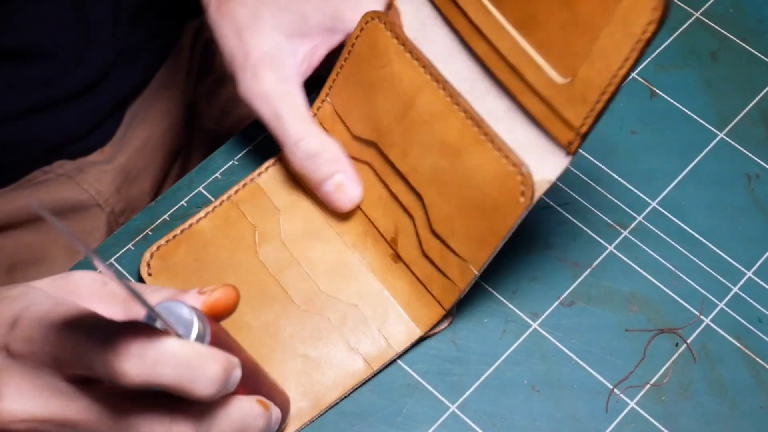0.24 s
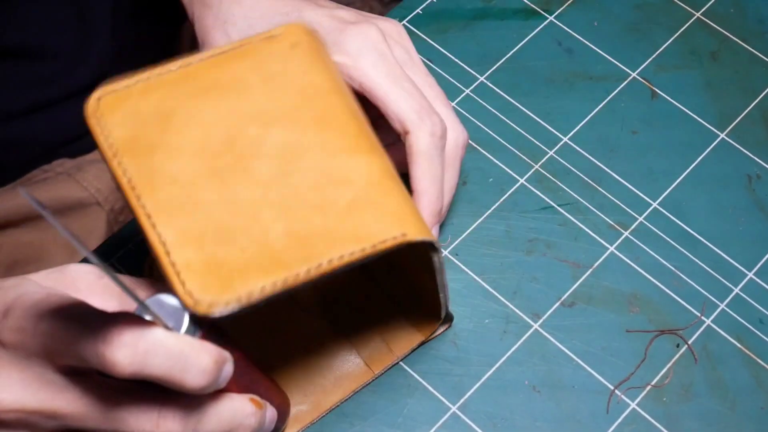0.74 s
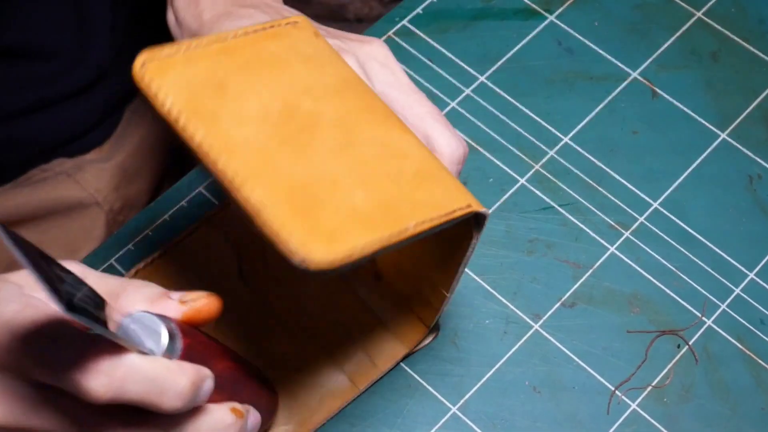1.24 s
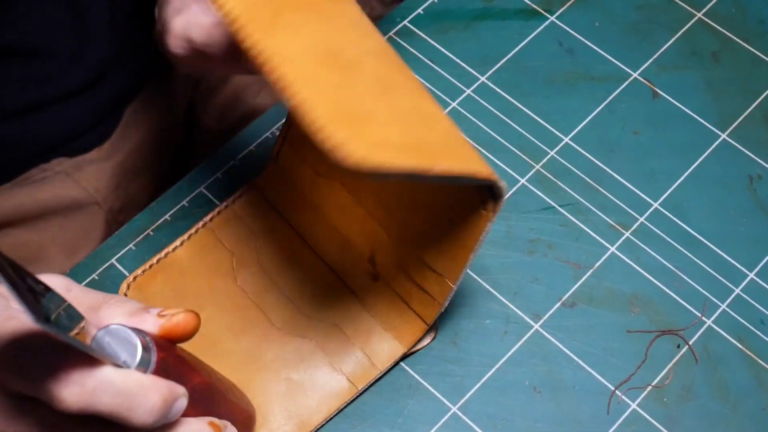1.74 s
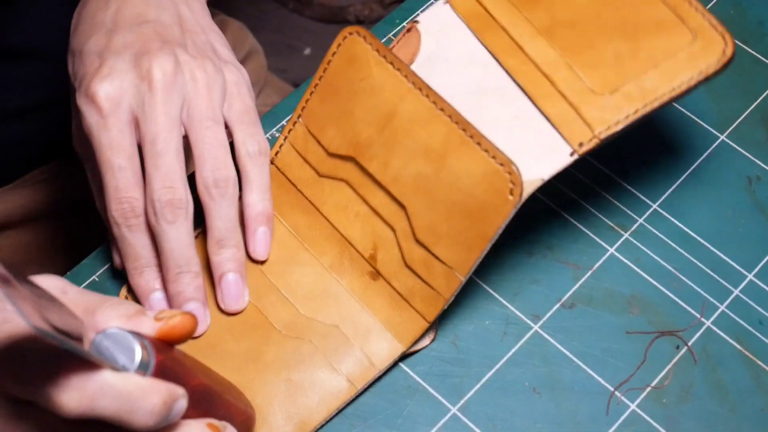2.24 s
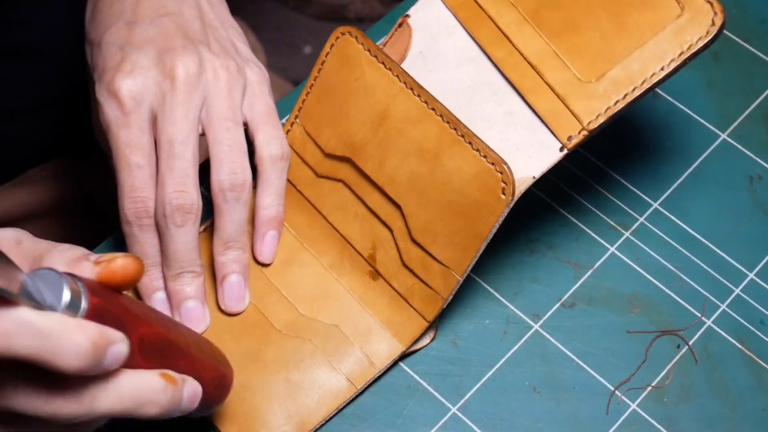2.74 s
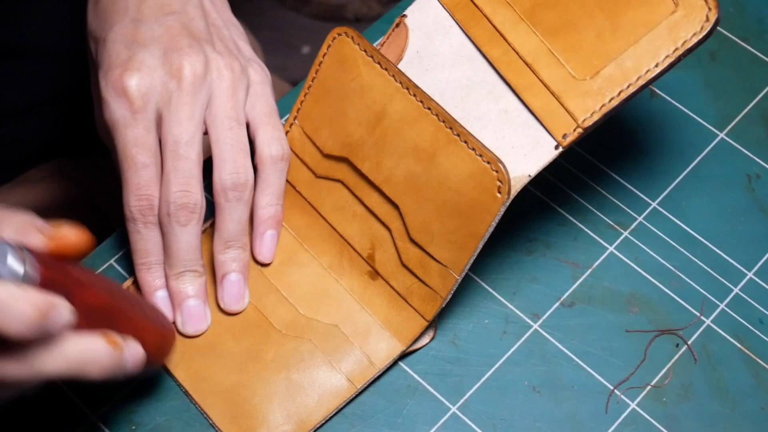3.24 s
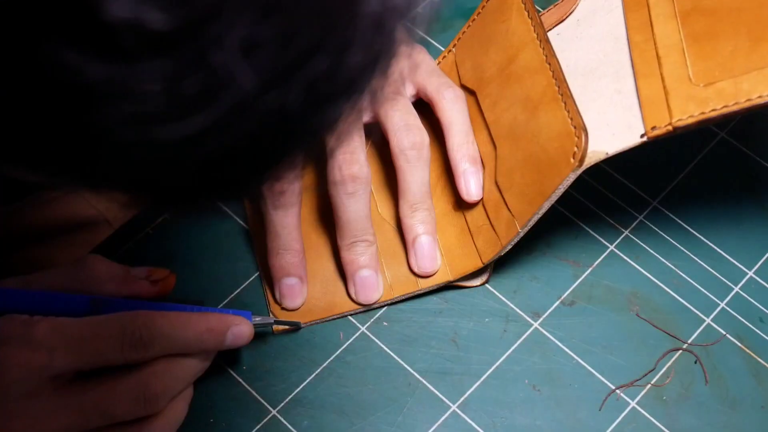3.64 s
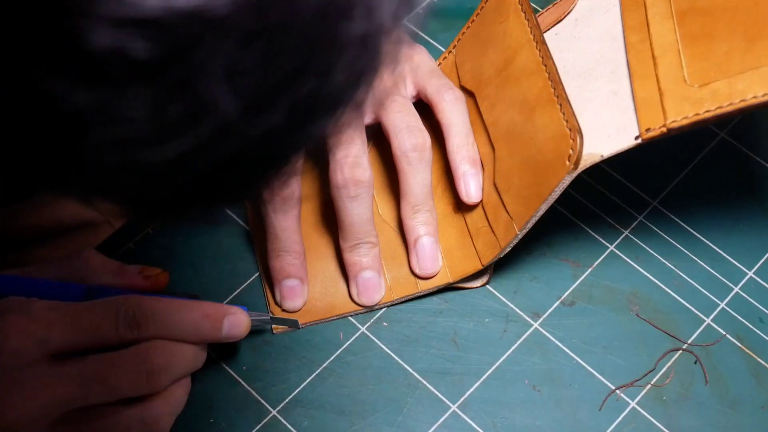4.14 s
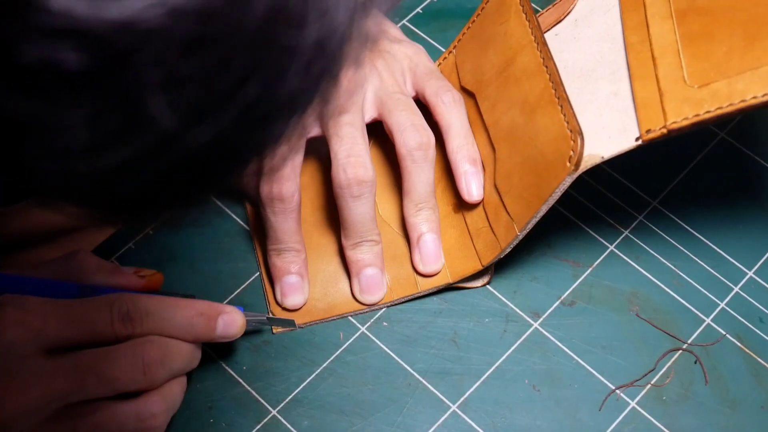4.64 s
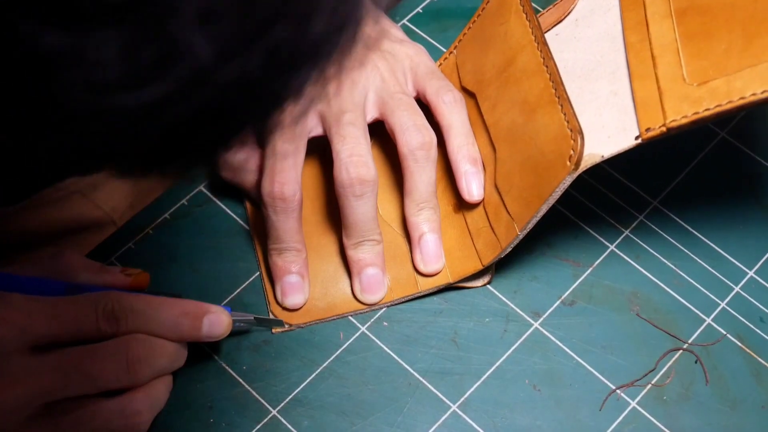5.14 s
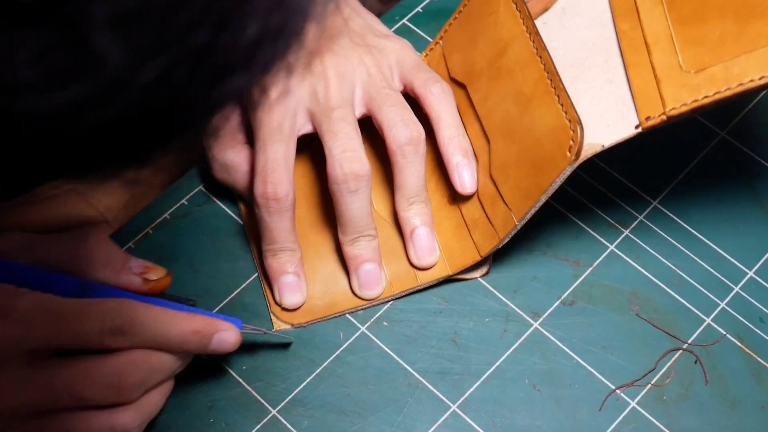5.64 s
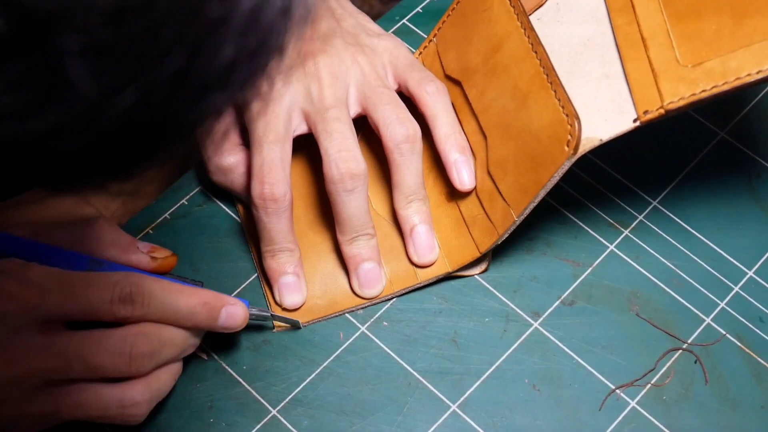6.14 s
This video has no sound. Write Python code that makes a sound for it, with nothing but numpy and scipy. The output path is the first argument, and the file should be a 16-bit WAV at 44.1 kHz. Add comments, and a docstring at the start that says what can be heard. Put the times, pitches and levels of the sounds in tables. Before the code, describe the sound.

Close to a workbench in a small room, leather snaps softly and a wallet cover flops over. Five hard, overloaded knocks thump and crack, ringing the bench top and rattling loose tools, the last three close together. Then a small motor hums upward under a growing rush of air, while a pen taps and scratches the leather edge. A faint, very rapid ticking runs throughout.

```python
"""Five hard knocks on a workbench top in a small room: thump, crack, ringing modes and rattling loose tools.
A leather wallet is handled there: bursts of band noise make its snaps, flopping cover, pen taps and scratches;
swelling, grainy noise makes the rubbing strokes. A faint, even ticking of 50 short bursts a second runs through.
After the last knock a small motor runs up, as rising harmonics under a rush of air, while the pen works on.
Steady coloured noise is the still air, and dying bands of noise are the room."""
import sys
import numpy as np
from scipy import signal
from scipy.io import wavfile

SR = 44100
rng = np.random.default_rng(int(sys.argv[2]) if len(sys.argv) > 2 else 0)


def dump(signal):
    """Clip the signal to [-1, 1] and save it as 16-bit WAV at the path in sys.argv[1]."""
    limited = np.clip(np.atleast_2d(signal).T, -1, 1)
    pcm = np.round(limited * 32767).astype(np.int16)
    wavfile.write(sys.argv[1], SR, pcm)


N = 281799
TIME = np.arange(N) / SR

# bright air spectrum shared by the rubbing and the motor: (frequency [Hz], relative density [dB per Hz])
HISS_SPECTRUM = [(4000, -16), (6000, -40), (7400, 8.5), (8200, 2), (10000, -1), (13000, 0), (15500, -15)]


def from_db(db):
    """Decibels to amplitude gain."""
    return 10 ** (np.asarray(db) / 20)


def rms_one(x):
    """Scale to unit power."""
    return x / np.sqrt(np.mean(x ** 2) + 1e-20)


def in_time(rows):
    """Draw each column of a breakpoint curve as straight lines over the whole scene."""
    times, *columns = np.transpose(rows)
    return [np.interp(TIME, times, column) for column in columns]


def at_hz(points, hz):
    """Read a curve at a frequency, straight on a logarithmic frequency axis."""
    curve_hz, values = np.array(points).T
    return np.interp(np.log(hz), np.log(curve_hz), values)


def add(out, s, sound):
    """Mix a sound in at a given time in seconds."""
    start = round(s * SR)
    out[:, start:start + sound.shape[-1]] += sound[..., :N - start]


def band(x, low_hz, high_hz, order=2):
    """Causal Butterworth band-pass."""
    sos = signal.butter(order, [low_hz, high_hz], "band", fs=SR, output="sos")
    return signal.sosfilt(sos, x)


def drift(rate):
    """Random curve about zero: straight lines between unit-spread knots, rate knots per second."""
    knots = rng.standard_normal(2000)
    return np.interp(TIME * rate, np.arange(len(knots)), knots)


def noise_bands(size, span=(0, np.inf)):
    """Yield (centre Hz, stereo noise) by third octaves; shared and opposed parts set how alike the sides are."""
    # (frequency [Hz], left-right likeness [0 to 1])
    likeness = [(60, 0.53), (250, 0.32), (500, 0.17), (1000, 0.067), (2500, 0.96), (4500, 0.49),
                (12000, 0.05)]
    white = rng.standard_normal((2, 2, size))
    edges = 32 * 2 ** (np.arange(28) / 3)
    for k, (low, high) in enumerate(zip(edges, edges[1:])):
        hz = np.sqrt(low * high)
        if span[0] <= hz <= span[1]:
            mid, side = band(white[k % 2], low, high)  # neighbouring bands draw on separate noise
            alike = np.clip(at_hz(likeness, hz), -1, 1)
            yield hz, np.sqrt((1 + alike) / 2) * mid + np.sqrt((1 - alike) / 2) * side * [[1], [-1]]


def coloured(spectrum):
    """Stereo noise shaped to a spectrum band by band, at unit rms."""
    bands = noise_bands(N, span=(spectrum[0][0], spectrum[-1][0]))
    return rms_one(sum(from_db(at_hz(spectrum, hz)) * noise for hz, noise in bands))


def burst(low_hz, high_hz, decay_s, width):
    """A brief crunch of dying contact noise; both sides together hold the energy of a decay from 1."""
    t = TIME[:SR // 8]
    dying = rng.standard_normal((2, len(t))) * np.exp(-t / decay_s)
    mid, side = band(dying, low_hz, high_hz, order=3)
    stereo = mid + width * side * [[1], [-1]]
    return stereo * np.sqrt(decay_s * SR / 2 / np.sum(stereo ** 2))


def knocks(ring_delay_s=0.001332, echo_s=0.00882, echo_db=-11, rattle_delay_s=0.0097, scatter_db=-18, radiate_db=30):
    """Thump, reflection, crack, ring and tools landing again; returns the near sound and the room's feed."""
    # knocks: (time [s], thump [dB], crack [dB], edge [dB], ring [dB], rattle [dB], rattle decay [s])
    blows = [(0.2326, 1, -9, -9.5, -2.5, -30, 0.009), (1.4924, 0.5, -2.5, -10.5, -0.5, -32.5, 0.011),
             (2.5681, 0, -4.5, -18, -0.5, -33.5, 0.0085), (2.8540, 3.5, -7.5, -44, 0, -29.5, 0.0067),
             (3.1222, 3.5, -13.5, -17, 1, -26, 0.016)]
    # modes of the bench top: (frequency [Hz], relative level [dB], t60 [s])
    bench_modes = [(125, -17, .32), (196, -22, .2), (217, -18, .26), (246, -27, .25), (274, -16, .2),
                   (312, -22, .2), (349, -15.5, .27), (386, -27, .25), (415, -29, .3), (452, -19.5, .34),
                   (490, -27, .3), (517, -30, .33), (554, -28, .27), (608, -26, .32), (657, -32, .25),
                   (683, -33, .28), (720, -34, .33), (800, -33, .3), (895, -36, .33)]
    # modes of the hard contact: (frequency [Hz], relative level [dB], t60 [s])
    crack_modes = [(640, -45, 0.017), (880, -28, 0.0023), (1233, 1, 0.012), (1746, -2.5, 0.011),
                   (2645, -6, 0.009), (3920, -10, 0.0033)]
    # modes of loose metal tools: (frequency [Hz], relative level [dB], t60 [s])
    tool_modes = [(2160, -4, .025), (3195, -7, .02), (3440, -9, .02), (4020, -9, .025), (6925, -8, .04),
                  (9785, -15, .03)]

    near, sent = np.zeros((2, 2, N))
    slap = band(signal.unit_impulse(SR // 20), 345, 1800)
    for s, thump_db, crack_db, edge_db, ring_db, rattle_db, rattle_s in blows:
        push = from_db(thump_db) * thump(hz=308, swell_s=0.0021, right_lag_s=0.00028)
        add(near, s - .0003, push)
        add(near, s + echo_s, from_db(echo_db) * push)
        add(near, s, from_db(crack_db) * struck(crack_modes, vary_db=3.0, spread=0.038, polarity=-1.056))
        add(near, s, from_db(edge_db) * burst(1980, 3620, decay_s=0.0028, width=0.16))
        add(near, s, from_db(edge_db - 17.0) * burst(3500, 14000, decay_s=0.001, width=1.0))
        # the blow scatters through the top as a short dense clatter
        add(near, s + .003, from_db(scatter_db) * burst(800, 2610, decay_s=0.011, width=0.12))
        add(near, s + ring_delay_s, -from_db(ring_db) * struck(bench_modes, vary_db=0.53, spread=0.18))

        # the tools land again: contact noise, which also excites their metal
        chatter = from_db(rattle_db) * burst(2100, 13600, decay_s=rattle_s, width=0.54)
        metal = struck(tool_modes, vary_db=2.0, spread=.7)
        add(near, s + rattle_delay_s, chatter)
        add(near, s + rattle_delay_s, from_db(-16.0) * signal.fftconvolve(chatter, metal, axes=1))

        # the whole top radiates into the room
        add(sent, s, push)
        add(sent, s, from_db(radiate_db + 0.18 * crack_db) * slap)
        add(sent, s + rattle_delay_s, chatter)
    return near, sent


def thump(hz, swell_s, right_lag_s):
    """The top gives under the blow in a few heavily damped swings; the air follows their slope."""
    t = np.maximum(TIME[:SR // 8] - np.array([[0], [right_lag_s]]), 0)
    swell = (t / swell_s) ** 2 * np.exp(2 - 2 * t / swell_s)
    swing = -swell * np.cos(2 * np.pi * hz * t)
    return np.gradient(swing, axis=1) * SR / (2 * np.pi * hz)


def struck(modes, vary_db, spread, polarity=1):
    """Decaying modes, weighted anew at every blow, unequal and slightly out of step at the two sides."""
    # where the modes lean: (frequency [Hz], left minus right [dB])
    side_lean = [(125, -1.5), (250, -1.5), (350, 1), (480, 1.5), (650, 2), (950, -1), (3000, 1)]
    t, out, sides = TIME[:SR], 0, np.array([[1], [-1]])
    for k, (hz, db, t60) in enumerate(modes):
        skew = spread * rng.standard_normal() * sides  # phase [rad]
        height = from_db(db + vary_db * rng.standard_normal() + sides * at_hz(side_lean, hz) / 2)
        decay = np.exp(-np.log(1000) * t / t60)
        out = out + polarity ** k * height * decay * np.sin(2 * np.pi * hz * t + skew)
    return out


def flop(start_s=.7848, face_delay_s=.002):
    """The cover falls over: its edge snaps, then its face slaps and scuffs to rest."""
    out = np.zeros((2, N))
    face_s = start_s + face_delay_s
    add(out, start_s, snap(-15, hz=2340, octaves=0.93, decay_s=0.0025, treble_db=-37))
    add(out, face_s, from_db(-16) * burst(low_hz=520, high_hz=2200, decay_s=0.0023, width=.21))
    add(out, face_s, from_db(-34.5) * burst(low_hz=1440, high_hz=2670, decay_s=0.045, width=0.36))
    return out


def clicks():
    """Dull snaps of folded and pressed leather, narrow pen taps on the edge, bright scratches of a catching tip."""
    # leather snaps: (time [s], level [dB], decay [s])
    leather_snaps = [(0.0989, -40.5, .0026), (0.2202, -28, 0.011), (.6662, -39.5, 0.0015),
                     (.707, -40, .0017), (.7645, -40, .0022), (1.0822, -35.5, .006), (2.083, -38.5, 0.0064),
                     (2.101, -38, 0.0034)]
    # pen taps: (time [s], level [dB], pitch [Hz])
    pen_taps = [(4.3288, -26, 2600), (4.4172, -38, 2200), (4.5962, -25, 2580), (5.9122, -33.5, 3270),
                (6.032, -41, 3430)]
    # pen scratches: (time [s], level [dB])
    pen_scratches = [(4.940, -38), (5.436, -22), (5.4718, -20.5), (5.483, -21), (5.9594, -40), (5.978, -35)]
    out = np.zeros((2, N))
    for s, db, decay_s in leather_snaps:
        add(out, s, snap(db, hz=1940, octaves=1.3, decay_s=decay_s, treble_db=-25))
    for s, db, hz in pen_taps:
        add(out, s, snap(db, hz, octaves=0.53, decay_s=.0023, treble_db=-28))
    for s, db in pen_scratches:
        add(out, s, snap(db, hz=2370, octaves=1.29, decay_s=.0045, treble_db=-4.5))
    return out


def snap(db, hz, octaves, decay_s, treble_db):
    """A small contact: a woody noise body about its pitch and a share of bright edge."""
    ratio = 2 ** (octaves / 2)
    body = burst(hz / ratio, hz * ratio, decay_s, width=0.18)
    edge = burst(6150, 12100, decay_s, width=0.92)
    return from_db(db) * (body + from_db(treble_db) * edge)


def rubbing(grain_db=3.0, level_db=-4.0):
    """Strokes swell and fade; the grain of the leather catches and lets go many times in each."""
    # strokes: (middle [s], half length [s], body before the overall level [dB])
    strokes = [(0, 0.022, -49.5), (0.723, 0.025, -53.5), (0.821, .022, -42), (1.188, .11, -51),
               (1.274, 0.033, -44), (2.235, 0.22, -59.5), (5.115, .12, -51.5), (5.381, 0.032, -39),
               (5.479, 0.028, -36.5), (5.67, 0.082, -51.5), (5.98, 0.026, -45)]
    # body of the rub: (frequency [Hz], relative density [dB per Hz])
    rub_spectrum = [(600, -22), (1200, 3), (1800, 5), (2900, 2.5), (4000, -4), (5800, -27)]
    pen_from_s = 3.4  # before this the hand rubs, afterwards the pen
    hand_hiss_db, pen_hiss_db = -18.5, -9  # hiss against body; the pen's holds for a quick stroke
    quick_stroke_s, dulling_db_per_octave = 0.025, 7  # slower strokes of the pen hiss less
    body, hiss = 0, 0
    for s, half_s, db in strokes:
        stroke = from_db(db) * np.exp(-.5 * np.abs((TIME - s) / half_s) ** 2.4)
        hiss_db = hand_hiss_db
        if s > pen_from_s:
            hiss_db = pen_hiss_db - dulling_db_per_octave * np.log2(half_s / quick_stroke_s)
        body = body + stroke
        hiss = hiss + stroke * from_db(hiss_db)
    grain = from_db(grain_db * drift(rate=220) + level_db)
    return grain * (body * coloured(rub_spectrum) + hiss * coloured(HISS_SPECTRUM))


def motor(rumble_db=-53, flutter_db=1.0):
    """Orders 2 to 4 of the speed hum and climb ever more slowly, over rumble and an unsteady, growing rush of air."""
    # hum before the order weights: (time [s], second order [dB], third order [dB])
    hum_levels = [(3.4, -51, -42), (3.74, -50, -50.5), (4.06, -48, -40.5), (4.42, -53, -45),
                  (4.64, -47, -42.5), (4.84, -44, -55), (5.31, -34.5, -37), (5.79, -35, -35.5),
                  (6.3, -36.5, -31.5)]
    # rush of air: (frequency [Hz], relative density [dB per Hz])
    rush_spectrum = [(150, -8), (200, 3.5), (280, 1), (400, -7.5), (520, -6.5), (650, -6.5), (900, -18),
                     (1150, -19.5), (1900, -18.5), (2900, -24.5), (4200, -25.5), (5800, -42.5)]
    start_s, rise_s = 3.28, 0.082
    start_hz, top_hz, spin_up_s = 45.3, 54.0, 3.05  # speed at the start, its limit, time constant
    rush_db, rush_db_per_s, air_hiss_db = -48, 1.7, -69.5

    age = np.maximum(TIME - start_s, 0)
    speed = top_hz - (top_hz - start_hz) * np.exp(-age / spin_up_s)
    angle = 2 * np.pi * np.cumsum(speed) / SR
    even_db, odd_db = in_time(hum_levels)
    # weights of orders 2, 3 and 4; the fourth follows the second
    order_levels = [even_db + 0.5, odd_db - 0.5, even_db - 16.5]
    hum = np.sqrt(2) * sum(from_db(db) * np.sin(k * angle) for k, db in enumerate(order_levels, 2))
    hum = hum * from_db([[.5], [-.5]])  # slightly to the left

    rush = from_db(rush_db + rush_db_per_s * age) * hollow(coloured(rush_spectrum))
    air = rush + from_db(air_hiss_db) * coloured(HISS_SPECTRUM)
    air = air * from_db(flutter_db * drift(rate=12))
    rumble = from_db(rumble_db) * rms_one(band(rng.standard_normal(N), 96, 184, order=3))
    return np.minimum(age / rise_s, 1) * (hum + air + rumble)


def hollow(x):
    """Narrow resonances add to parts of a steady noise."""
    # resonances: (frequency [Hz], width [Hz], level [dB])
    resonances = [(485, 31, 7), (707, 12, 6.5), (803, 35, -3), (910, 18, 12.5), (2780, 200, -4)]
    out = x
    for hz, width, db in resonances:
        b, a = signal.iirpeak(hz, hz / width, fs=SR)
        out = out + from_db(db) * signal.lfilter(b, a, x)
    return out


def ticking(offbeat_db=-5, uneven_db=2):
    """Tiny noise ticks on a strict beat, strong and weak in turn, each a little uneven in level."""
    # strong ticks: (time [s], level [dB])
    tick_levels = [(0, -50), (.5, -59), (1.0, -48), (1.45, -47.5), (1.75, -54.5), (2.0, -45.5), (3.5, -55)]
    out = np.zeros((2, N))
    level_db = in_time(tick_levels)[0]
    for k, s in enumerate(np.arange(.0035, 6.36, .02)):  # one every 20 ms
        db = level_db[round(s * SR)] + offbeat_db * (k % 2) + uneven_db * rng.standard_normal()
        add(out, s, from_db(db) * burst(1610, 3120, decay_s=0.0029, width=0.48))
    return out


def room(x, gap_s=0.00082):
    """Reverberation of a small room: noise that dies at its own rate in each band, fading in after a gap."""
    # colour: (frequency [Hz], reverberation level [dB])
    reverb_colour = [(60, -6), (200, -14), (400, -12), (650, -9.5), (1200, -17.5), (2500, -11.5),
                     (4000, -10), (5700, -13), (7200, -1.5), (9000, -4), (15000, -8.5)]
    # decay: (frequency [Hz], t60 [s])
    reverb_t60 = [(100, 0.61), (500, 0.43), (2500, 0.5), (7500, 0.46), (11000, 0.28), (15000, 0.24)]
    t, response = TIME[:SR], 0
    for hz, noise in noise_bands(SR):
        decay_s = at_hz(reverb_t60, hz) / np.log(1000)
        level = from_db(at_hz(reverb_colour, hz)) * np.sqrt(2 / (decay_s * SR))
        response = response + level * noise * np.exp(-t / decay_s)
    response = response * np.clip(t / gap_s - 1, 0, 1)
    mono = x.mean(axis=0)[None]
    return signal.fftconvolve(mono, response, axes=1)[:, :N]


def still_air(level_db=-47.5):
    """The still air as steady coloured noise."""
    # background: (frequency [Hz], relative density [dB per Hz])
    floor_spectrum = [(18, -56), (30, -11), (64, -16.5), (124, -2), (215, 0.5), (404, -9), (499, 1),
                      (632, -23), (702, -10), (1130, -19.5), (2120, -25.5), (2980, -27.5), (5590, -38.5),
                      (14000, -40), (16000, -67)]
    return from_db(level_db) * coloured(floor_spectrum)


def scene():
    """Work on the bench, its room, the motor and the still air."""
    near, sent = knocks()
    handling = flop() + clicks() + rubbing() + ticking()
    return near + handling + room(sent + handling) + motor() + still_air()


def record(dry, low_cut_hz=55, top_cut_hz=15850):
    """The knocks overload the input and are flattened; deep bass and the very top are cut."""
    flattened = dry / (1 + dry ** 8) ** (1 / 8)
    low_cut = signal.butter(1, low_cut_hz, "high", fs=SR, output="sos")
    top_cut = signal.ellip(10, .1, 80, top_cut_hz, fs=SR, output="sos")
    return signal.sosfilt(top_cut, signal.sosfilt(low_cut, flattened))


dry = scene()
out = record(dry)
dump(out)
```